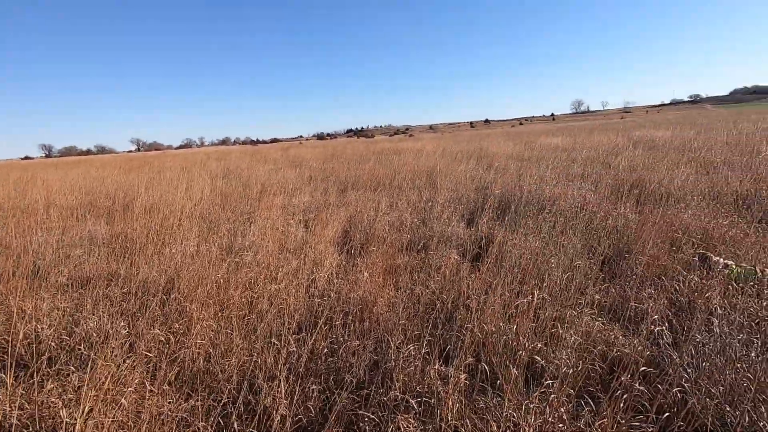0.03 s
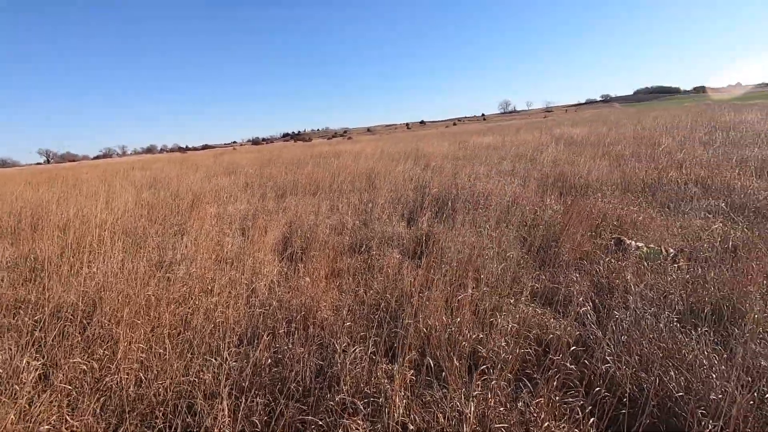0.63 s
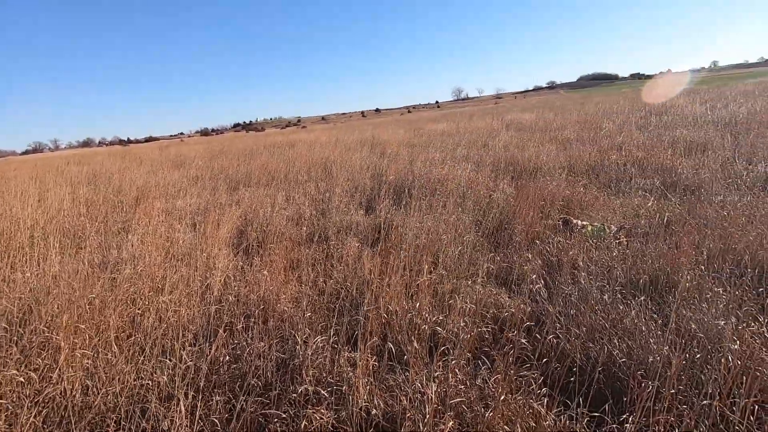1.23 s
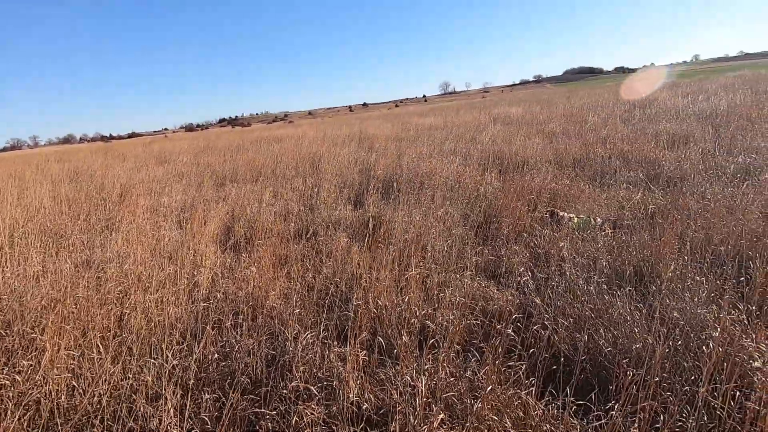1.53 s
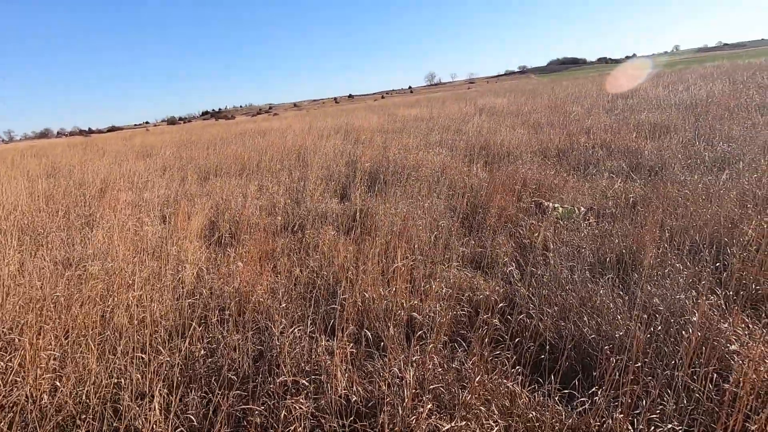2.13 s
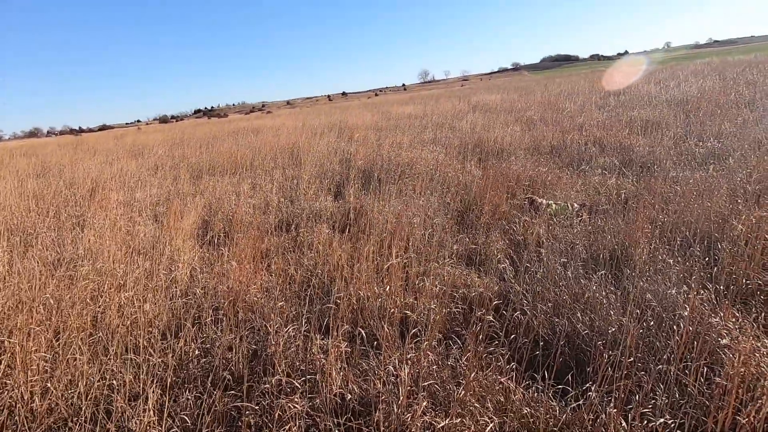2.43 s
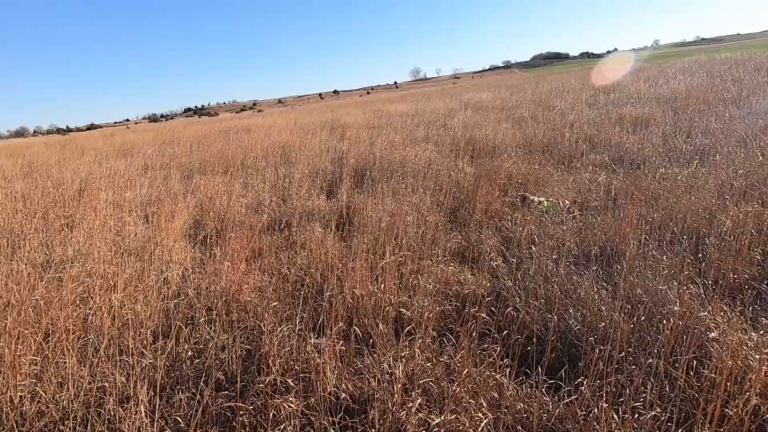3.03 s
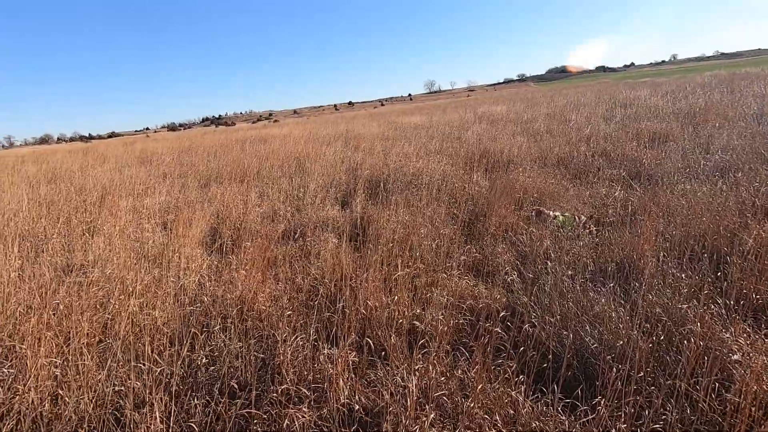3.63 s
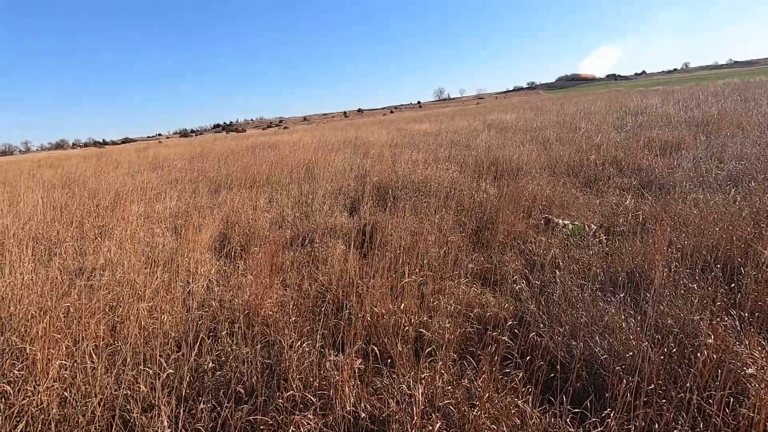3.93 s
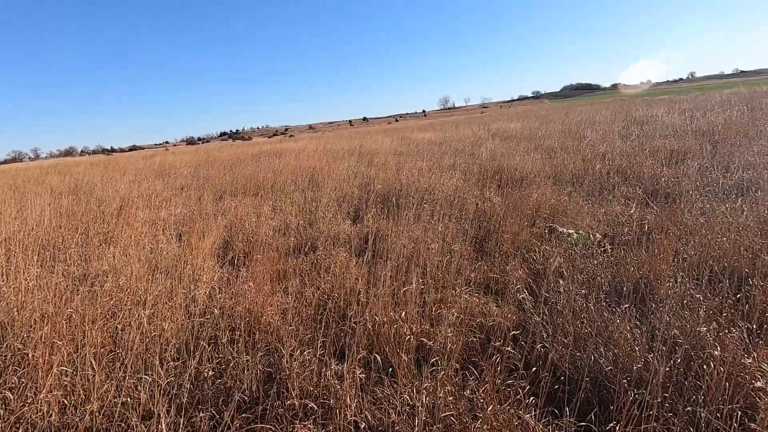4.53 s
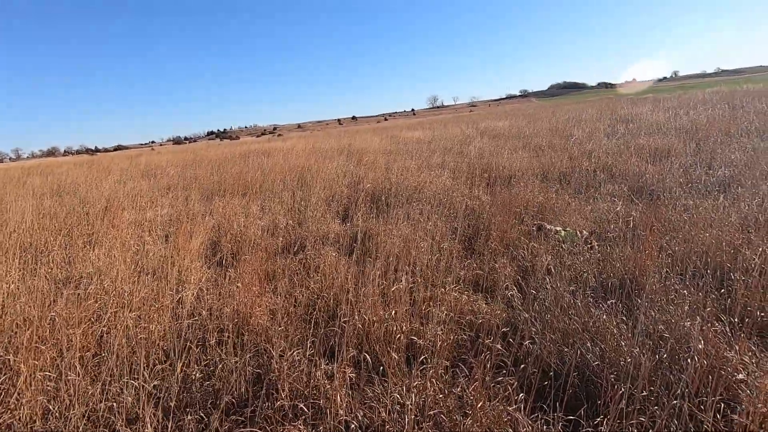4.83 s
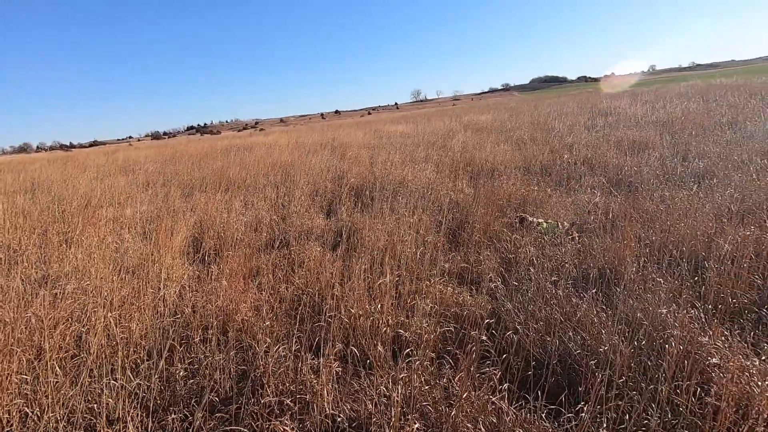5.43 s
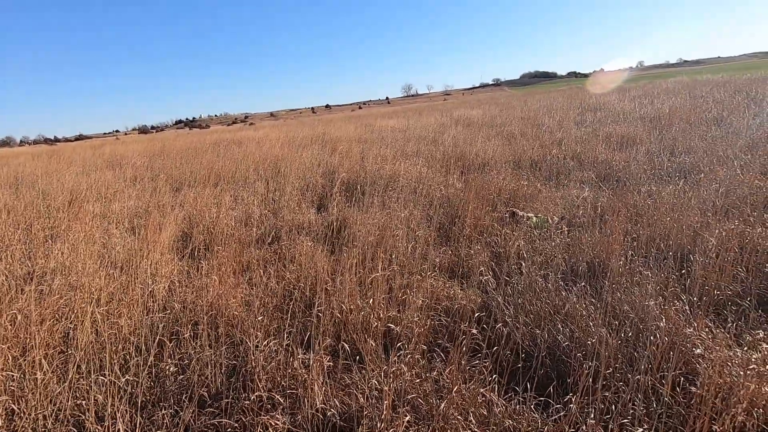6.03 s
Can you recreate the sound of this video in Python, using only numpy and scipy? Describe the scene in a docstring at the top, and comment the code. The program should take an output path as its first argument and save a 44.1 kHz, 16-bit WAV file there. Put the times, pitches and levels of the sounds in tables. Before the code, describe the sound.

Someone walks slowly through tall dry grass over the faint hush of an open field. Stems swish against the legs in soft, uneven sweeps with a fine crackle, sparse at first and nearly continuous from about 0.8 seconds. Low wind rumbles on the microphone, dips just before 2 seconds, then gusts at about 2.6 seconds and keeps swelling. Faint bird chirps come near 1.2 seconds, and a quick run of high, falling chirps follows between 3.6 and 4 seconds. Stalks crack underfoot around 3.6, 4.2 and 4.9 seconds, with small scrapes along a leg. The grass swishes most firmly near 3.5 and 4.7 seconds. The strongest gust arrives at about 5.6 seconds, followed by a dry tick and a few faint, hoarse chirps, while the rustling continues to the end, just past 6 seconds. The sound is quiet overall and slightly muffled on the left.

```python
"""An open field of tall dry grass, where someone walks slowly in a light wind.
Legs push the stems aside and seed heads brush past with a fine crackle: friction and countless small
impacts excite the stems' resonances. Stalks crack underfoot, tick together and scrape along a leg,
with a few dull knocks, and small birds chirp in gliding whistles. The turbulent pressure of gusts
rumbles on the two microphone ports, of which the left one is muffled."""
import sys
import numpy as np
from scipy import signal
from scipy.fft import rfft, irfft, next_fast_len
from scipy.io import wavfile
from scipy.ndimage import uniform_filter1d

SR = 44100
rng = np.random.default_rng(int(sys.argv[2]) if len(sys.argv) > 2 else 0)


def persist_wave(psi):
    """Save psi, clipped to +-1, as 16-bit WAV."""
    counts = np.round(np.clip(psi, -1, 1) * 32767).astype(np.int16)
    wavfile.write(sys.argv[1], SR, np.atleast_2d(counts).T)


N = 276595
TIME = np.arange(N) / SR
FFT_SIZE = next_fast_len(N + 4096)
BIN_HZ = np.maximum(np.arange(FFT_SIZE // 2 + 1) * SR / FFT_SIZE, 1)


def from_db(db):
    """Amplitude grows tenfold for every 20 dB."""
    return 10 ** (np.asarray(db) / 20)


def rms_one(x):
    """Normalisation to unit power."""
    return x / np.sqrt(np.mean(x ** 2) + 1e-20)


def in_time(rows):
    """Linear interpolation of each column at every sample."""
    times_s, *columns = np.transpose(rows)
    return [np.interp(TIME, times_s, column) for column in columns]


def over_hz(points):
    """Interpolation at every bin, on a logarithmic frequency axis."""
    hz, value = np.transpose(points)
    return np.interp(np.log(BIN_HZ), np.log(hz), value)


def colour(x, spectrum):
    """Spectral shaping to unit power, falling 12 dB per octave beyond the spectrum's ends."""
    skirts = np.minimum(1, BIN_HZ / spectrum[0][0]) ** 2 * np.minimum(1, spectrum[-1][0] / BIN_HZ) ** 2
    shaped = rfft(x, FFT_SIZE) * from_db(over_hz(spectrum)) * skirts
    return rms_one(irfft(shaped, FFT_SIZE)[..., :N])


def drift(rate_hz, hop=40, settle=2000):
    """Random modulation: low-passed noise of unit spread."""
    pole = np.exp(-2 * np.pi * rate_hz * hop / SR)
    noise = rng.standard_normal(N // hop + settle + 2)
    slow = signal.lfilter([1], [1, -2 * pole, pole * pole], noise)[settle:]
    return np.interp(np.arange(N) / hop, np.arange(len(slow)), rms_one(slow))


def resonate(x, hz, width_hz):
    """A damped resonator with unit gain at its peak."""
    r = np.exp(-np.pi * width_hz / SR)
    feedback = [1, -2 * r * np.cos(2 * np.pi * hz / SR), r * r]
    return signal.lfilter(np.array([1, 0, -1]) * (1 - r * r) / 2, feedback, x)


def add(track, start_s, sound):
    """Superposition of a short sound on a track."""
    at = max(round(start_s * SR), 0)
    track[at:at + len(sound)] += sound[:N - at]


def swells(rows, fall_over_rise=1):
    """Gaussian envelopes summed in power, one track for each level column."""
    power = 0
    for peak_s, rise_s, *levels_db in rows:
        offset = (TIME - peak_s) / np.where(TIME < peak_s, rise_s, rise_s * fall_over_rise)
        bell = np.exp(-np.minimum(offset ** 2, 60))
        power = power + np.outer(from_db(levels_db) ** 2, bell)
    return power


def together_db(steady_db, swell_power):
    """Incoherent sounds add in power."""
    return 10 * np.log10(from_db(steady_db) ** 2 + swell_power)


# Response of the left port relative to the right: frequency_hz, gain_db
LEFT_RESPONSE = [(300, -1), (700, -3.3), (1300, -4.5), (1800, -4.5), (2400, -.5), (3300, 0.1), (4100, -5),
                 (5000, -13), (7000, -17), (8000, -12), (9300, -20), (14000, -18)]
# Phase of the left port relative to the right: frequency_hz, lead_rad
LEFT_LEAD = [(150, 7), (350, -3), (600, -2.5), (900, -2.5), (1300, -4.5), (2200, -4.5), (4300, -5.5),
             (6500, -6)]
# Likeness of diffuse sound at the two ports: frequency_hz, coherence_ratio
PORT_COHERENCE = [(300, 0.43), (800, 0.9), (1300, 0.6), (1600, 0.61), (2400, 0.45), (4200, 0.9),
                  (5200, 0.063), (8000, .08)]

def two_ports(right, unrelated=None):
    """Transfer function to the muffled left port; diffuse sound arrives there only partly coherent."""
    left = rfft(right, FFT_SIZE) * np.exp(1j * over_hz(LEFT_LEAD))
    if unrelated is not None:
        coherence = np.clip(over_hz(PORT_COHERENCE), 0, 1)
        left = coherence * left + np.sqrt(1 - coherence ** 2) * rfft(unrelated, FFT_SIZE)
    left = left * from_db(over_hz(LEFT_RESPONSE))
    return np.array([irfft(left, FFT_SIZE)[:N], right])


# Spectrum of the open field's hush: frequency_hz, relative_density_db
HUSH_SPECTRUM = [(150, 4.5), (350, 4.5), (540, -4), (750, 3.5), (840, 4), (950, -3.5), (1300, -12),
                 (2000, -17.5), (3300, -18.5), (5000, -12.5), (10000, -22), (11500, -38), (15000, -56)]

def field_hush(level_db=-70.5):
    """A diffuse sound field: steady noise arrives from all around."""
    return from_db(level_db) * two_ports(*colour(rng.standard_normal((2, N)), HUSH_SPECTRUM))


def eddies(spectrum, unshared, smooth_s):
    """Turbulent pressure: an even part common to both ports, plus a part in antiphase."""
    shared, apart = colour(rng.standard_normal((2, N)), spectrum)
    window = int(smooth_s * SR)
    local_power = uniform_filter1d(uniform_filter1d(shared ** 2, window), window)
    return shared / np.sqrt(local_power + 1e-6) + unshared * apart * np.array([[1], [-1]])


# Underlying wind on the ports: time_s, rumble_db, buffet_db
BREEZE = [(0.0, -48.5, -52.5), (0.58, -46.5, -67), (0.94, -55.5, -67), (1.42, -56, -62),
          (1.67, -53.5, -69.5), (1.82, -76.5, -80), (1.95, -59, -89), (2.0, -43.5, -55.5), (2.49, -44, -60),
          (2.62, -30.0, -44), (3.0, -38.5, -53), (3.06, -41.5, -72), (3.18, -40.0, -56),
          (4.62, -40.5, -48.5), (5.18, -43.5, -63.5), (5.52, -31.5, -44), (6.1, -51.5, -76),
          (6.27, -45, -63)]
# Gusts that swell and die on top of it: peak_s, rise_s, rumble_db, buffet_db
GUST_SWELLS = [(0.181, 0.014, -48, -72.5), (0.329, 0.017, -43, -78.0), (0.459, 0.031, -39, -88),
               (0.932, 0.017, -41.5, -62), (1.155, 0.072, -40.5, -57.5), (1.537, 0.013, -45, -59.0),
               (2.232, 0.035, -36.5, -58), (2.562, 0.036, -27, -64), (3.269, 0.041, -34.5, -46),
               (3.387, 0.027, -33.5, -46.5), (3.586, 0.054, -38.5, -51), (3.796, 0.055, -34.0, -51.5),
               (3.917, 0.018, -34, -67), (4.063, 0.022, -38, -72), (4.203, 0.045, -36, -68),
               (4.288, 0.017, -29.5, -52), (4.48, 0.06, -28, -64), (5.402, 0.03, -31.5, -48.5),
               (5.59, 0.029, -23.5, -40.5), (5.691, 0.016, -31.5, -63), (5.789, 0.029, -33, -51),
               (5.922, 0.076, -32, -48.5)]
# Spectrum of large eddies: frequency_hz, relative_density_db
RUMBLE_SPECTRUM = [(12, -4.5), (22, -1), (32, 1), (50, -1), (75, -8), (105, -13.5), (150, -25.5),
                   (260, -54)]
# Spectrum of small eddies: frequency_hz, relative_density_db
BUFFET_SPECTRUM = [(60, -7), (110, 2), (145, -0.5), (200, -5.5), (280, -17.5), (400, -29), (600, -43),
                   (1200, -40)]

def wind():
    """Turbulence on the ports: large eddies rumble and small ones buffet, each at its own level."""
    rumble_db, buffet_db = together_db(in_time(BREEZE), swells(GUST_SWELLS))
    rumble_gain = from_db(rumble_db - 0.12 + 1.5 * drift(17.4))
    rumble = eddies(RUMBLE_SPECTRUM, unshared=0.49, smooth_s=0.042)
    buffet_gain = from_db(buffet_db - 1.6 + 2.1 * drift(19))
    buffet = eddies(BUFFET_SPECTRUM, unshared=0.83, smooth_s=0.043)
    return rumble_gain * rumble + buffet_gain * buffet


def contacts(per_s, spread_db, low_hz, high_hz, q, stems=12):
    """Shot noise: each random touch rings one stem briefly; two independent tracks."""
    out = np.zeros((2, N))
    for track in out:
        at = np.flatnonzero(rng.random(N) < per_s / SR)
        size_draw, sign_draw, stem_draw = rng.random((N // 2, 3))[:len(at)].T
        size_db = spread_db * np.minimum(-np.log(1 - size_draw), 4.5)  # capped exponential law
        impulses = from_db(size_db) * np.sign(sign_draw - 0.5)
        stem = (stem_draw * stems).astype(int)
        for k, hz in enumerate(np.geomspace(low_hz, high_hz, stems)):
            clicks = np.bincount(at[stem == k], impulses[stem == k], N)
            track += resonate(clicks + 1e-18 * TIME, hz, hz / q)  # the tiny ramp prevents underflow
    return rms_one(out / np.sqrt(per_s))


def rustle(level_db, touches, spectrum, friction, clump_db, clump_hz):
    """Stick-slip: contacts and sliding friction bunch up as tufts catch and come free."""
    rub = colour(touches + friction * rng.standard_normal((2, N)), spectrum)
    gain = from_db(level_db + clump_db * drift(clump_hz))
    return two_ports(*(rub * gain))


def split_push(push_db, thin_over_thick_db):
    """Conservation of power: thick and thin stems share one push."""
    thick_db = push_db - 10 * np.log10(1 + from_db(thin_over_thick_db) ** 2)
    return thick_db, thick_db + thin_over_thick_db


# Stems trailing along the legs between sweeps: time_s, level_db
TRAILING_STEMS = [(0.0, -77.5), (0.66, -77.5), (0.74, -72), (2.6, -71.5), (2.86, -74.5), (3.3, -72),
                  (4.6, -70.5), (5.34, -72.5), (5.8, -69.5), (6.27, -71.5)]
# A leg sweeping through a tuft: peak_s, rise_s, push_db, thin_over_thick_db, brush_db
LEG_SWEEPS = [(0.045, .065, -71, -3.5, -81), (0.425, 0.049, -78, 2, -78.5), (0.75, .035, -71, -12, -75),
              (0.888, 0.052, -67, 9.5, -67), (1.011, .04, -71.5, 5, -74), (1.122, 0.031, -80, 0, -70.5),
              (1.26, 0.076, -68.5, 3.5, -75), (1.63, 0.061, -70.5, 3, -70), (1.761, 0.069, -73, 1, -73),
              (1.983, .05, -65.5, 4.5, -66), (2.087, .04, -73, 15, -71), (2.309, .1, -66.5, 2, -71.5),
              (2.549, 0.096, -69.5, 3, -70.5), (3.09, 0.095, -70, 0.5, -70.5),
              (3.484, 0.031, -61.5, 2.5, -66.5), (3.611, 0.043, -69, -2, -74), (3.713, .05, -65, 4, -65.5),
              (3.869, 0.075, -71, -5, -74.5), (4.028, .035, -66, 2.5, -74.5),
              (4.19, .045, -68.5, -9, -72.5), (4.313, 0.061, -66.5, 0, -67.5), (4.46, 0.059, -72, -7, -71),
              (4.6, 0.061, -61.5, 3, -67.5), (4.728, .04, -59, 9, -62), (4.829, 0.064, -66.5, -0.5, -71),
              (5.19, 0.078, -73, 2, -74), (5.484, 0.053, -66, 1, -62), (5.642, 0.039, -68.5, 2, -69.5),
              (5.889, 0.086, -66.5, 1, -71.5), (6.08, 0.093, -66.5, -2, -72),
              (6.248, 0.062, -67.5, -20, -85)]
# Spectrum of thick stems: frequency_hz, relative_density_db
THICK_SPECTRUM = [(300, -3), (520, 2), (750, 4), (950, 4), (1300, 3.5), (1600, 2.5), (2000, 0.5),
                  (2600, -5.5), (4000, -23)]
# Spectrum of thin stems: frequency_hz, relative_density_db
THIN_SPECTRUM = [(1200, -9), (2000, -1), (2600, -3), (3200, -0.5), (3700, -2.5), (4300, -7.5),
                 (5500, -16.5), (10000, -52)]
# Spectrum of brushed seed heads: frequency_hz, relative_density_db
HEAD_SPECTRUM = [(1500, -13.5), (3000, -7.5), (4000, -3), (5000, 0), (7000, -2), (7950, -9.5), (9200, 0),
                 (10200, -4), (11500, -16), (13500, -14), (15000, -32)]

def walking():
    """Contact excitation: a harder push moves more stems; thick ones rustle low, thin ones hiss."""
    trail_db, = in_time(TRAILING_STEMS)
    trailing_db = [*split_push(trail_db, thin_over_thick_db=2.5), trail_db]
    sweeps = [(peak_s, rise_s, *split_push(push_db, balance_db), brush_db)
              for peak_s, rise_s, push_db, balance_db, brush_db in LEG_SWEEPS]
    sweep_power = swells(sweeps, fall_over_rise=1.1)  # stems spring back more slowly than they bend
    thick_db, thin_db, brush_db = together_db(trailing_db, sweep_power)
    push = np.hypot(from_db(thick_db), from_db(thin_db))
    stems_per_s = 4000 * push / push.max() + 900
    heads_per_s = 9000 * from_db(brush_db - brush_db.max()) + 2500
    thick = contacts(stems_per_s, spread_db=2.5, low_hz=662, high_hz=2400, q=6.4)
    thin = contacts(stems_per_s, spread_db=1.0, low_hz=2000, high_hz=5120, q=6.6)
    heads = contacts(heads_per_s, spread_db=1.0, low_hz=3500, high_hz=13500, q=1.36)
    return (rustle(thick_db + 6.5, thick, THICK_SPECTRUM, friction=1.0, clump_db=1.07, clump_hz=13)
            + rustle(thin_db + 1.17, thin, THIN_SPECTRUM, friction=1.0, clump_db=1.12, clump_hz=31)
            + rustle(brush_db + 5.0, heads, HEAD_SPECTRUM, friction=1.8, clump_db=0.94, clump_hz=16)
            + husks(brush_db))


# Spectrum of hard-brushed husks: frequency_hz, relative_density_db
SIZZLE_SPECTRUM = [(7500, -17), (9300, 1.5), (10500, 1), (11700, -5), (13500, -13.5), (15000, -22)]

def husks(brush_db, hardest_sizzle_db=-63, growth=1.55, snap_gain_db=-15.5):
    """A power law: the sizzle of husks grows faster than the brushing; now and then one snaps."""
    sizzle = two_ports(*colour(rng.standard_normal((2, N)), SIZZLE_SPECTRUM))
    sizzle_db = hardest_sizzle_db + growth * (brush_db - brush_db.max())
    clicks = contacts(per_s=10, spread_db=4.0, low_hz=3000, high_hz=11000, q=0.93, stems=4)
    snaps = two_ports(*colour(clicks, HEAD_SPECTRUM))
    return from_db(sizzle_db) * sizzle + from_db(brush_db + snap_gain_db) * snaps


# Stalks cracking underfoot, and dull knocks:
# start_s, relative_db, pitch_hz, t60_s, splinter_ratio, left_lead_rad
CRACKS_AND_KNOCKS = [(0.013, -54, 1095, 0.055, 0, 2.5), (0.018, -50, 255, 0.023, 0, -4.5),
                     (0.067, -60, 1180, 0.017, 0.3, 3.5), (2.4289, -54, 1450, 0.006, 0.53, 0),
                     (3.5716, -47.5, 1080, 0.0016, 0.4, 4), (3.5748, -44, 1010, 0.0018, .1, 3.5),
                     (3.5747, -48, 304.6, 0.011, 0, 1), (3.5788, -51.5, 1250, 0.0037, 0.2, 2.9),
                     (3.5806, -57, 1480, 0.0021, 0, 4.5), (4.174, -49.5, 1230, 0.0083, 0.48, 4.8),
                     (4.219, -48, 1100, 0.0034, 0.58, 4), (4.251, -59, 1440, 0.013, .3, 0.5),
                     (4.2645, -51, 1020, 0.0049, .1, 4.5), (4.2718, -54, 970, 0.0033, 0.94, 1),
                     (4.294, -54, 1490, 0.0039, 0.5, 2.5), (4.311, -55, 2020, 0.014, 0.3, 1.5),
                     (4.9105, -47.5, 1183, 0.0076, 0.37, 1.7), (5.931, -58, 1354, .02, .5, 1)]

def cracks_and_knocks(splinter_s=0.0012, splinter_hz=2900, gain_db=8.0, left_db=-8):
    """Damped free vibration: each crack or knock rings briefly, most with a splintering burst."""
    out, t = np.zeros((2, N)), TIME[:SR // 10]
    for start_s, level_db, pitch_hz, t60_s, splinter_ratio, lead_rad in CRACKS_AND_KNOCKS:
        envelope = (1 - np.exp(-t * pitch_hz)) ** 2 * np.exp(-np.log(1000) * t / t60_s)
        burst = rng.standard_normal(len(t)) * np.exp(-t / splinter_s)
        burst = resonate(resonate(burst, splinter_hz, width_hz=1640), splinter_hz, width_hz=4100)
        splinters = splinter_ratio * burst / np.abs(burst).max()
        for port, phase, port_db in zip(out, (lead_rad, 0), (left_db, 0)):
            ring = envelope / envelope.max() * np.sin(2 * np.pi * pitch_hz * t + phase)
            add(port, start_s, from_db(level_db + gain_db + port_db) * (ring + splinters))
    return out


# Bird chirps and hoarse squeaks: start_s, length_s, relative_db, top_hz, fall_hz, hoarseness_ratio
BIRD_CHIRPS = [(0.215, 0.01, -63, 4260, 358, .6), (1.178, 0.022, -55, 2630, 200, 0.43),
               (1.191, 0.011, -57, 3900, 2, .6), (1.214, 0.015, -57, 3400, -3, 0.5),
               (1.251, 0.012, -61, 2672, 0, 0.3), (1.252, 0.024, -53.5, 3910, 470, 0.4),
               (3.574, 0.02, -53, 3850, 510, 0.9), (3.75, .018, -54, 4600, 898, 0.2),
               (3.811, 0.017, -47, 4800, 1400, 0.2), (3.871, 0.02, -47, 4670, 1499, 0.2),
               (3.939, 0.024, -49, 4430, 1100, 0.13), (5.796, 0.031, -50.5, 3277, 260, 1),
               (5.828, 0.023, -59, 3750, 0, .7), (5.871, 0.02, -57, 3480, 0, 0.74)]

def chirps(rise_share=0.12, top_at=0.34, waver=0.076, gain_db=-3.5):
    """Frequency modulation: each whistle arches up and most fall away; jitter makes it hoarse."""
    out, jitter = np.zeros(N), waver * drift(450)
    for start_s, length_s, level_db, top_hz, fall_hz, hoarseness in BIRD_CHIRPS:
        progress = np.linspace(0, 1, int(length_s * SR))
        rising = rise_share * top_hz * (1 - progress / top_at) ** 2
        falling = fall_hz * ((progress - top_at) / (1 - top_at)) ** 2
        pitch_hz = top_hz - np.where(progress < top_at, rising, falling)
        pitch_hz *= 1 + hoarseness * jitter[int(start_s * SR):][:len(progress)]
        whistle = np.sin(2 * np.pi * np.cumsum(pitch_hz) / SR)
        add(out, start_s, from_db(level_db + gain_db) * np.sin(np.pi * progress) * whistle)
    return out


# Dry stems ticking close by: start_s, peak_db
STEM_TICKS = [(0.726, -56), (1.463, -53), (5.676, -44)]

def ticks(decay_s=0.0013, centre_hz=6500):
    """A brief impact has a broad spectrum: one stiff stem flicks against another."""
    out, t = np.zeros(N), TIME[:SR // 50]
    lowpass = signal.butter(2, 10000, fs=SR, output="sos")
    for start_s, peak_db in STEM_TICKS:
        flick = rng.standard_normal(len(t)) * np.exp(-t / decay_s)
        tick = signal.sosfilt(lowpass, resonate(flick, centre_hz, width_hz=6500))
        add(out, start_s, from_db(peak_db) * tick / np.abs(tick).max())
    return out


# Single stalks dragged along a leg: start_s, length_s, relative_db, start_hz, end_hz
STALK_SCRAPES = [(3.42, 0.048, -63.5, 3200, 2400), (3.483, 0.024, -55, 2110, 3063),
                 (3.999, 0.058, -62.5, 2900, 3110), (4.318, .025, -64, 3190, 3500),
                 (4.591, 0.053, -58.5, 2000, 2307), (4.731, 0.043, -62, 2590, 2210),
                 (5.934, .05, -61, 1397, 2290), (6.235, 0.041, -62, 1904, 2282)]

def scrapes(width_hz=800, gain_db=-1.0):
    """Resonance depends on free length, so the broad peak of a dragged stalk glides."""
    out = np.zeros(N)
    lowpass = signal.butter(2, width_hz / 2, fs=SR, output="sos")
    for start_s, length_s, level_db, start_hz, end_hz in STALK_SCRAPES:
        progress = np.linspace(0, 1, int(length_s * SR))
        friction = signal.sosfilt(lowpass, rng.standard_normal((2, SR // 4)))[:, -len(progress):]
        phase = 2 * np.pi * np.cumsum(start_hz + (end_hz - start_hz) * progress) / SR
        ring = rms_one(friction[0] * np.cos(phase) + friction[1] * np.sin(phase))
        add(out, start_s, from_db(level_db + gain_db) * np.sin(np.pi * progress) * ring)
    return out


def scene():
    """Superposition: steps, birds and wind add to the hush of the field."""
    return (field_hush() + walking() + cracks_and_knocks()
            + two_ports(ticks() + scrapes() + chirps()) + wind())


def record(dry, cutoff_hz=15100):
    """Band limiting: an elliptic low-pass cuts the top steeply."""
    return signal.sosfilt(signal.ellip(10, 0.1, 80, cutoff_hz, fs=SR, output="sos"), dry)


dry = scene()
out = record(dry)
persist_wave(out)
```